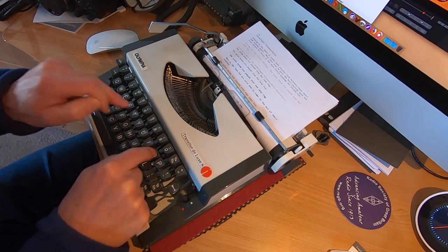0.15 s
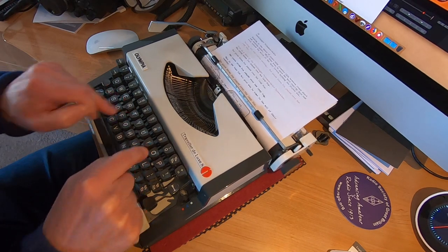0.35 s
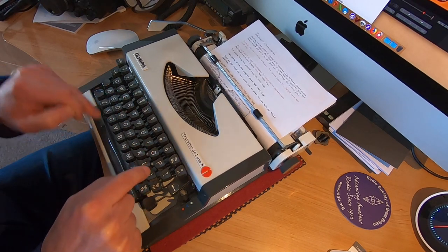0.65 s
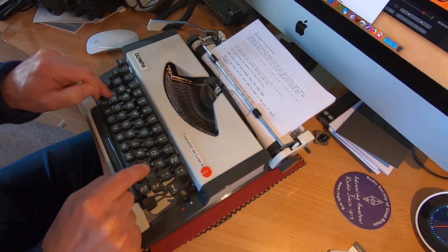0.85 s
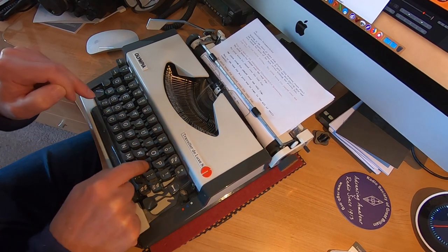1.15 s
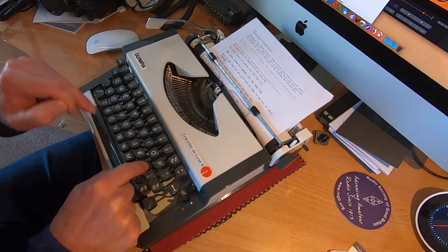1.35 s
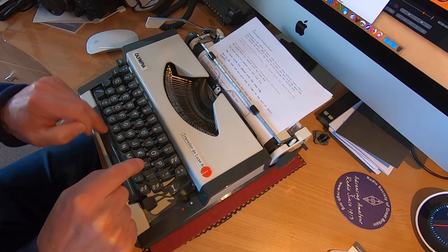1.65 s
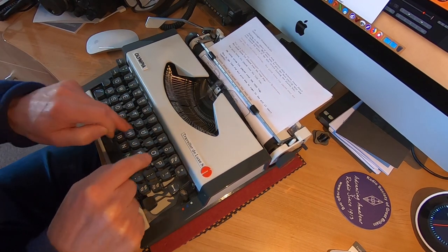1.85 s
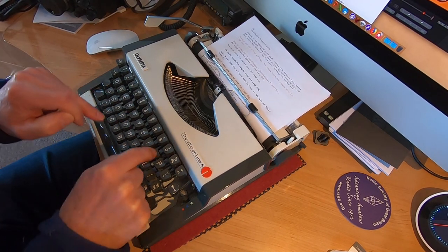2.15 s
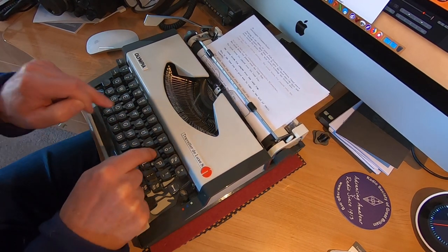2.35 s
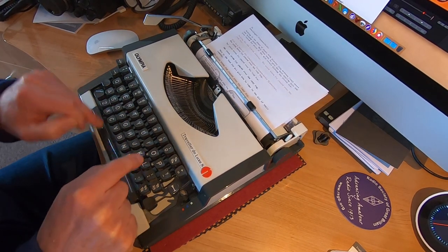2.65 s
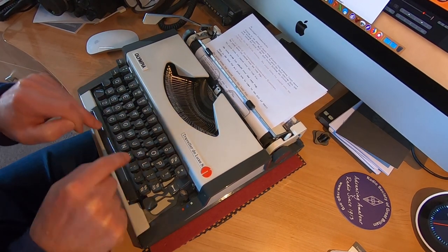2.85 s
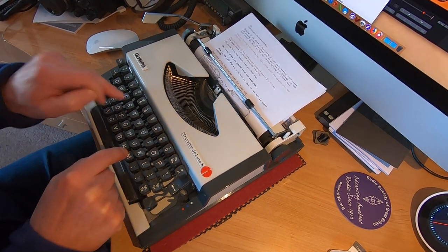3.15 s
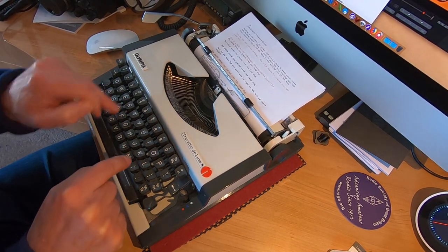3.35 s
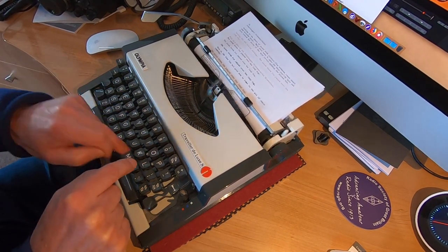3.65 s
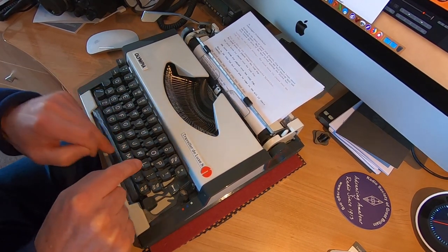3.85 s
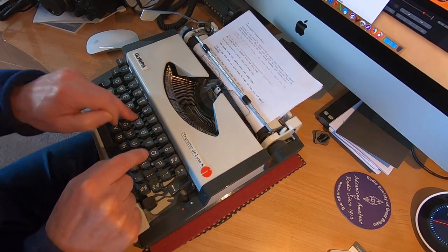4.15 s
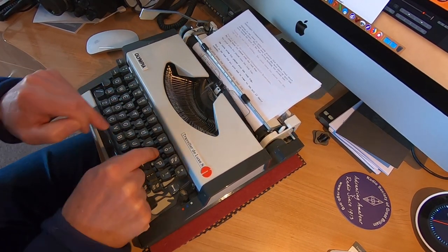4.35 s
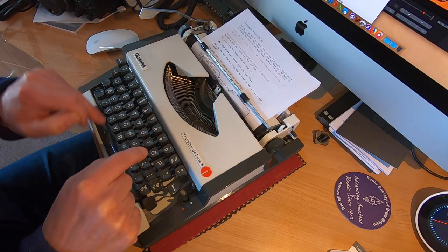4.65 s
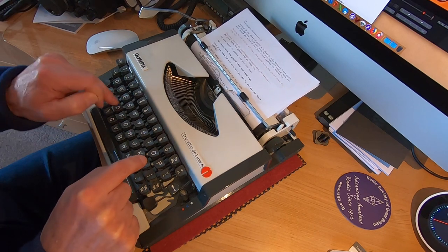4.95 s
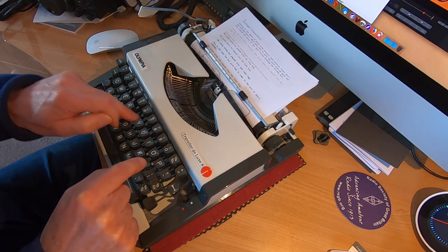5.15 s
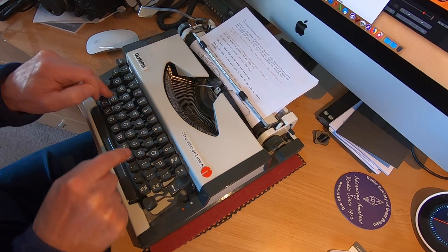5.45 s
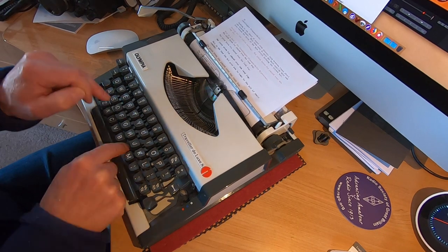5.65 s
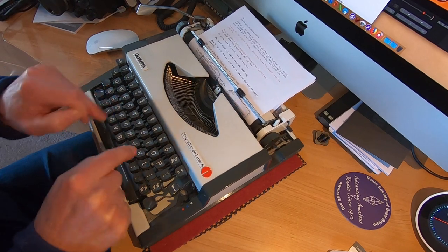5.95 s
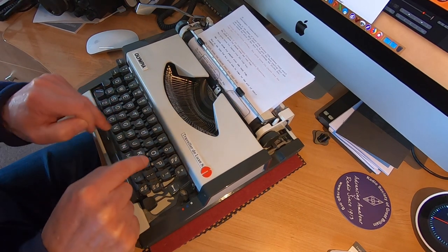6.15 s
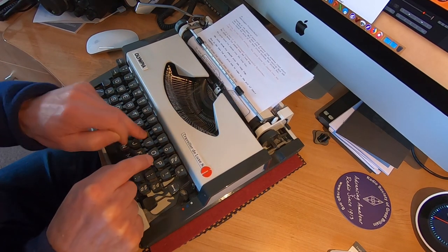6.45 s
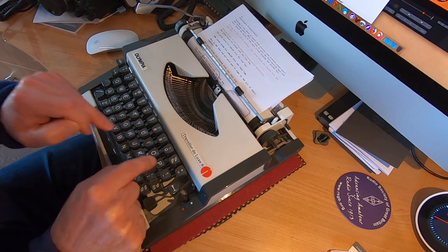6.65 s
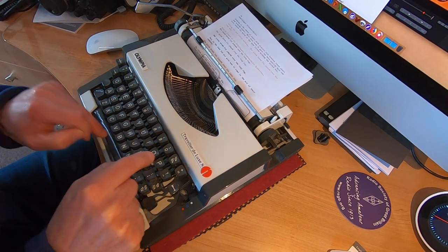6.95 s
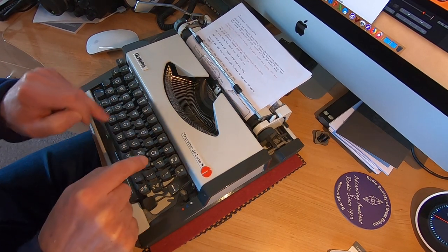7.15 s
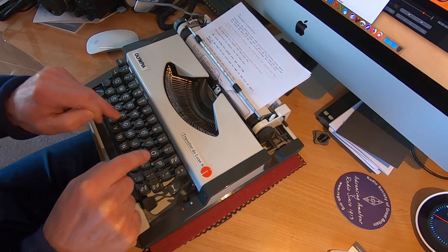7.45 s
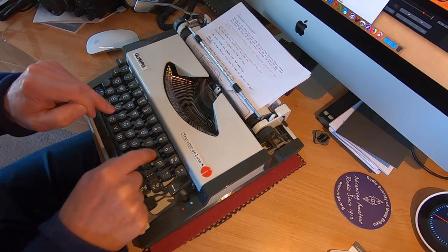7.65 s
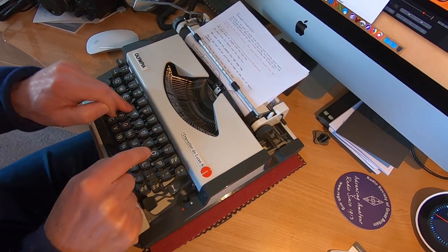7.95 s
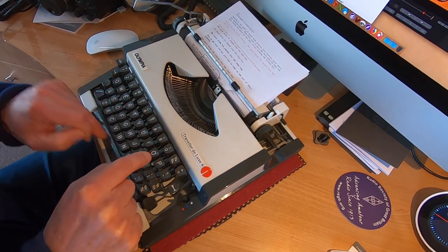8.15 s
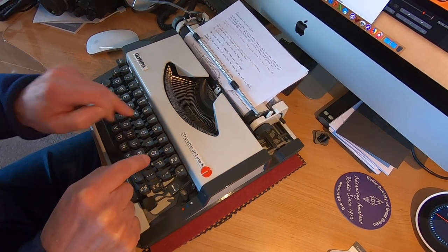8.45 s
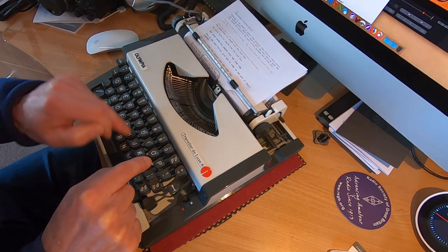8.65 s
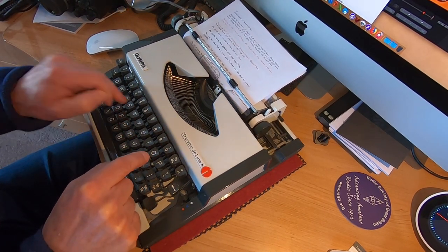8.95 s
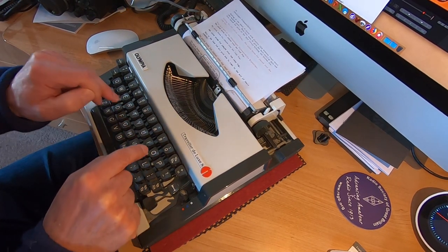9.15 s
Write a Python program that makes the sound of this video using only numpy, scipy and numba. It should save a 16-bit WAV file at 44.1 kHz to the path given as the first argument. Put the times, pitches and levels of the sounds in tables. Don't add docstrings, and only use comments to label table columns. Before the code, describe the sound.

Two fingers type steadily on a portable manual typewriter, sharp steel cracks on the platen, rattling levers, and duller space-bar knocks booming in a wooden desk.

```python
import sys
import numpy as np
from scipy import signal
from scipy.fft import rfft, irfft, next_fast_len
from scipy.io import wavfile
from numba import njit

SR = 44100
rng = np.random.default_rng(int(sys.argv[2]) if len(sys.argv) > 2 else 0)


def materialize(psi):
    bounded = np.clip(np.atleast_2d(psi).T, -1, 1)
    quanta = np.round(bounded * 32767).astype(np.int16)
    wavfile.write(sys.argv[1], SR, quanta)


def volts_from_decibels(level):
    exponent = np.asarray(level, float) / 20
    return 10 ** exponent


N = 409688


def level(x, db):
    return x * volts_from_decibels(db) / np.sqrt(np.mean(x ** 2))


def on_log_axis(table, hz):
    f, v = np.transpose(table)
    return np.interp(np.log(hz + 1), np.log(f + 1), v)


def colour(x, table):
    log_gain = on_log_axis(table, np.linspace(0, SR / 2, 2049)) * np.log(10) / 20
    cepstrum = irfft(log_gain)
    cepstrum[1:2048] *= 2
    cepstrum[2049:] = 0
    h = irfft(np.exp(rfft(cepstrum)))[:2048]
    return signal.oaconvolve(x, h / np.sqrt(np.sum(h ** 2)))[:N]


def soft(x, ms):
    w = np.hanning(int(ms * SR / 1000) + 3)
    return signal.oaconvolve(x, w / w.sum())[:N]


def ring(modes, scatter_db=0., detune=0.):
    hz, db, t60 = np.transpose(modes)[:, :, None]
    chance = rng.standard_normal((len(modes), 2))
    t = np.arange(int(SR * t60.max())) / SR
    decay = volts_from_decibels(db + scatter_db * chance[:, :1] - 60 * t / t60)
    h = np.sum(decay * np.sin(2 * np.pi * hz * (1 + detune * chance[:, 1:]) * t), axis=0)
    return h / np.abs(h).max()


def add(track, s, x):
    k = int(s * SR)
    piece = x[max(-k, 0):max(N - k, 0)]
    track[max(k, 0):max(k, 0) + len(piece)] += piece


def envelope(rise_ms, hold_ms, change_db, t60_ms):
    return [(-rise_ms, -40), (0, 0), (hold_ms, change_db), (hold_ms + t60_ms * 2 / 3, change_db - 40)]


def fade_db(shape):
    ms, db = np.transpose(shape)
    return np.interp(np.arange(ms[0], ms[-1], 1000 / SR), ms, db)


def burst(power, s, shape, db):
    add(power, s + shape[0][0] / 1000, volts_from_decibels(db + fade_db(shape)) ** 2)


@njit
def grains(starts, hz, size, t60):
    out = np.zeros(N)
    for k in range(len(starts)):
        r, w = np.exp(-np.log(1000) / (t60[k] * SR)), 2 * np.pi * hz[k] / SR
        turn, now, before = 2 * r * np.cos(w), size[k] * np.sin(w), 0.
        for i in range(starts[k], min(starts[k] + int(t60[k] * SR * .5), N)):
            out[i] += now
            now, before = turn * now - r * r * before, now
    return out


def clatter(power, table, rate, spread_db, ring_ms, dense):
    when, pitch, luck = rng.random((int(rate * N / SR), 3)).T
    starts = (when * N).astype(np.int64)
    hz = 200 + 16000 * pitch ** 1.5
    t60 = ring_ms / 1000 * (hz / 3000) ** -.4
    size = volts_from_decibels(-spread_db * np.log(1 - .995 * luck)) * pitch ** .25 / np.sqrt(t60)
    size /= np.sqrt(np.sum(size ** 2 * t60) * SR / (4 * np.log(1000)) / N)
    live = power[starts] > 0
    contacts = grains(starts[live], hz[live], (size * np.sqrt(power[starts]))[live], t60[live])
    rustle = np.sqrt(power) * rng.standard_normal(N)
    return colour(np.sqrt(1 - dense) * contacts + np.sqrt(dense) * rustle, table)


def jolts(rows, lag_ms, gain_db):
    out = np.zeros(N)
    for s, db in rows:
        add(out, s + lag_ms / 1000, volts_from_decibels(np.array([db + gain_db])))
    return out


# frequency in Hz, gain in dB.
HUSH_COLOUR = [(15, -51), (25, -5), (112, 9.5), (383, -30), (558, -23), (621, -15.5), (856, -41),
               (1240, -19.5), (1950, -30), (2180, -18.5), (2400, -33), (3630, -30.5), (15000, -55)]


def hush():
    shared, apart = [level(colour(rng.standard_normal(N), HUSH_COLOUR), -53) for _ in range(2)]
    return shared + 0.64 * apart * np.array([[1], [-1]])


# start in seconds, weight on the desk in dB.
TOUCHES = [(.010, -37.5), (0.1982, -37.5), (0.3124, -41), (0.8914, -39), (1.1928, -40), (1.396, -39.5),
           (1.9147, -38.5), (2.1692, -38.5), (2.3707, -42), (2.5268, -39.5), (3.0602, -37), (3.2947, -41.5),
           (3.699, -40), (4.2173, -39.5), (4.4026, -42), (4.9006, -36), (5.2033, -35.5), (5.509, -40),
           (5.7273, -38.5), (5.887, -41.5), (6.476, -38.5), (6.827, -39.5), (7.416, -37), (7.737, -36),
           (7.985, -36), (8.576, -38.5), (8.7798, -37), (9.0716, -34.5)]
# start in seconds, knock level in dB.
RESTS = [(0.138, -40.5), (0.335, -42), (0.444, -38.5), (1.025, -30), (1.311, -46), (1.529, -38),
         (2.03, -44), (2.29, -40.5), (2.5, -36.5), (2.669, -40), (3.175, -47.5), (3.42, -42.5),
         (3.809, -34.5), (4.334, -36.5), (4.543, -40.5), (5.048, -32), (5.335, -33.5), (5.637, -31),
         (5.888, -38), (6.002, -32.5), (6.586, -40), (6.946, -39), (7.528, -43.5), (7.873, -52),
         (8.11, -36.5), (8.709, -28), (8.893, -32), (9.186, -51)]
# frequency in Hz, gain in dB.
LEVER_COLOUR = [(240, -24.5), (400, -12), (774, 0), (1080, -5), (1640, -2), (1770, -3.5), (2370, 0),
                (2720, -4.5), (2980, 1.5), (6830, -4), (9290, -5), (11700, -28), (14500, -25), (15600, -52)]


def levers():
    swing_grows_db = 10.5
    fall_from_ms = 18.3
    power = np.zeros(N)
    for (touch_s, _), (s, *_), (rest_s, _) in zip(TOUCHES, BLOWS, RESTS):
        swing_ms = 1000 * (s - touch_s)
        fall_ms = 1000 * (rest_s - s) - fall_from_ms
        swing_db = -31.5 - 0.27 * (swing_ms - 29.3)
        burst(power, touch_s, envelope(11, swing_ms, swing_grows_db, 15), swing_db - swing_grows_db)
        burst(power, s + 0.00374, envelope(19, -8.5, -3, 65), -29.5)
        burst(power, s + STEP_MS / 1000, envelope(25, -0.5, 1, 128), -35.5)
        burst(power, s + fall_from_ms / 1000, envelope(72, fall_ms, -0.5, 281), -42.5)
    return clatter(power, LEVER_COLOUR, 6000, 2.4, 16.0, dense=.45)


# frequency in Hz, level in dB, t60 in seconds.
DESK_MODES = [(41, -24.5, 0.2), (77.44, 2, 0.61), (93.8, 8.5, 0.26), (114.2, 0, 0.32), (159, -14.5, 0.13),
              (271, -17, 0.18)]


def desk():
    keys = [(s, db) for (s, *_), (_, db) in zip(BLOWS, TOUCHES)]
    landings = [(s, 0.38 * (db + 40.5)) for s, db in RESTS]
    push = jolts(keys, 6, 5.3) + jolts(keys, 50, 2.2)
    push -= jolts(TOUCHES, 4.1, -1)
    push += jolts(landings, 1.03, -41.5)
    for rows, lag_ms in zip(spaces(), (11, 5, 12)):
        push += jolts([(s, db) for s, _, db in rows], lag_ms, 0.69)
    lingering = signal.lfilter([1], [1, -volts_from_decibels(-60 / (.3 * SR))], np.abs(push) + 1e-18)
    shake = lingering * rng.standard_normal(N)
    sprung = signal.lfilter(*signal.butter(2, 55, "high", fs=SR), push + 1e-18)
    feet_contact_ms = 1.8
    return signal.oaconvolve(soft(sprung + volts_from_decibels(-25.5) * shake, feet_contact_ms), ring(DESK_MODES))[:N]


# frequency in Hz, gain in dB.
PLATEN_COLOUR = [(320, -41.5), (550, -24), (1240, -6.5), (1470, -16.5), (2110, -2.5), (3260, -4),
                 (3650, -5), (5630, -4), (6210, -8.5), (6750, -3.5), (9320, -9), (10700, -23),
                 (15600, -34.5)]


def ribbon_and_paper():
    power = np.zeros(N)
    for s, *_ in BLOWS:
        burst(power, s - .005, envelope(11, 5, .5, 12), -26)
        burst(power, s + .001, envelope(1.5, 2, -1, 58), -22)
    return clatter(power, PLATEN_COLOUR, 14000, 1.8, 6.0, dense=.55)


# start in seconds, peak in dB, platen pitch in Hz, steel ring in dB against the peak.
BLOWS = [(0.0446, -8.5, 2730, -3.5), (0.2363, -7.0, 2560, -9.5), (0.3381, -7.0, 2560, -7.0),
         (0.9258, -7.5, 2320, -5.5), (1.2315, -10.5, 2560, -8.5), (1.4285, -9.0, 2590, -6.5),
         (1.9482, -8.0, 2520, -3.5), (2.2112, -9.5, 2540, -4.5), (2.4108, -8.5, 2520, -4.5),
         (2.5685, -9.0, 2540, -0.5), (3.0885, -10.0, 2510, -0.5), (3.3272, -9.0, 2510, -1.5),
         (3.728, -10.0, 2480, -2.0), (4.2482, -10.0, 2460, -4.0), (4.4388, -10.0, 2510, -4.5),
         (4.9396, -10.5, 2890, -5.0), (5.2397, -11.0, 2460, -1.0), (5.5451, -10.5, 2400, -1.0),
         (5.7602, -13.0, 2530, 2.5), (5.9079, -14.0, 2200, 2.5), (6.5043, -13.5, 2470, 3.5),
         (6.8673, -14.5, 2990, -0.5), (7.4463, -12.5, 2830, 1.5), (7.7763, -12.5, 2980, 3.0),
         (8.0097, -12.5, 2690, 3.0), (8.6112, -10.0, 2900, -3.0), (8.8137, -12.0, 3110, 1.0),
         (9.1014, -14.0, 2980, 3.5)]
# frequency in Hz, level in dB, t60 in seconds.
SLUG_MODES = [(4270, -1.5, .016), (5650, 2.5, .015), (6600, 3.5, .016), (8000, -1.5, .017),
              (9300, -1.5, .018)]
# share of the platen pitch as a ratio, level in dB, t60 in seconds.
PLATEN_MODES = [(.8, -7, .016), (1.0, 0, .013), (1.3, -4.5, .013)]


def slugs():
    out = np.zeros(N)
    for s, db, hz, steel_db in BLOWS:
        steel = volts_from_decibels(db + steel_db + 1) * ring(SLUG_MODES, scatter_db=3, detune=.04)
        platen = volts_from_decibels(db + 2.5) * ring(np.array(PLATEN_MODES) * [hz, 1, 1], scatter_db=2)
        add(out, s - .0004, steel)
        add(out, s - .0002, platen)
        add(out, s + .003, volts_from_decibels(-6) * steel)
    no_bass = signal.butter(3, 1500, "high", fs=SR, output="sos")
    return signal.sosfilt(no_bass, soft(out, .06))


STEP_MS = 30.6
# frequency in Hz, level in dB, t60 in seconds.
FRAME_MODES = [(272, -6.5, 0.091), (457, -11.5, 0.12), (675, -17, 0.067), (762, -1, 0.057),
               (930, -4.5, 0.078), (1198, -8.5, 0.076)]


def frame():
    knocks = [(s, -42) for s, *_ in BLOWS]
    knocks += [(s + (STEP_MS + 6) / 1000, -34.5) for s, *_ in BLOWS]
    knocks += [(s + 0.00256, db + 2.5) for s, db in RESTS]
    out = np.zeros(N)
    for s, db in knocks:
        add(out, s, volts_from_decibels(db) * ring(FRAME_MODES, scatter_db=3, detune=.03))
    return soft(out, 0.28)


# start in seconds, peak in dB, pitch in Hz.
TICKS = [(0.1958, -21.5, 3750), (2.371, -25.5, 3340), (3.458, -23, 8900), (3.4756, -30, 9070),
         (4.3954, -30, 3060), (4.5481, -39, 3730), (5.0813, -23, 8400), (5.2003, -37, 4500),
         (5.675, -27, 8000), (6.041, -22, 8900), (7.5717, -21.5, 8900), (7.5997, -47, 9310),
         (7.7363, -31, 3470), (7.98, -21, 3170), (8.1502, -29.5, 8900), (8.7473, -21.5, 8350)]


def ticks():
    stem, spring = envelope(1.5, 3.5, 2, 68.5), envelope(15, 16, -12, 169)
    fizzes = [(s, db - 7.0, hz, 3.0, stem) for s, db, hz in TICKS]
    fizzes += [(s + .02, db - 5, 12900, 60, spring) for s, db, _ in spaces()[2]]
    out = np.zeros(N)
    for s, db, hz, sharpness, shape in fizzes:
        fade = volts_from_decibels(db + fade_db(shape))
        fizz = signal.lfilter(*signal.iirpeak(hz, sharpness, SR), rng.standard_normal(len(fade)))
        add(out, s + shape[0][0] / 1000, fade * fizz)
    return soft(out, .07)


# bar down in seconds, time until the carriage stops in ms,
# time until the bar is up in ms, peak in dB, weight on the desk in dB.
SPACES = [
    (.61, 30, 83, -21, -34),
    (1.6526, 29.5, 82, -21, -35),
    (2.7938, 35, 93, -21.5, -31.5),
    (3.9524, 33, 74, -19, -30),
    (4.5938, 34, 94, -19.5, -31.5),
    (6.1441, 33, 81, -20.5, -33.5),
    (7.0643, 34, 97, -18.5, -34),
    (8.2734, 36, 96, -19.5, -34),
]


def spaces():
    s, stop_ms, up_ms, db, jolt_db = np.transpose(SPACES)
    down = np.c_[s, db, jolt_db]
    stop = np.c_[s + stop_ms / 1000, db + 3, jolt_db - 7.5]
    up = np.c_[s + up_ms / 1000, db - 5.5, jolt_db - 2.5]
    return down, stop, up


# frequency in Hz, gain in dB.
BAR_COLOUR = [(240, -58), (400, -4.5), (644, -16), (750, 3.5), (989, -7.5), (1170, -6), (1800, -6),
              (3030, -5), (3320, -4.5), (7970, -7), (15600, -36.5)]
# frequency in Hz, level in dB, t60 in seconds.
BAR_MODES = [(287, -.5, .11), (665, -9.5, 0.036), (750, -1, .04), (810, -3, .04), (1230, -6, 0.04)]
# frequency in Hz, level in dB, t60 in seconds.
LINK_MODES = [
    [(3050, 0, .05)],
    [(6400, -3, .03), (8100, 0, .035)],
    [(3100, 0, .2), (4050, -1, .2)],
]


def space_bar():
    down, stop, up = (14, 12.6, 0.95, 194), (1.5, 7.5, -4, 59.5), (5, 23.3, 2.1, 142)
    rattle_lags_ms, hum_lags_s = (-.5, 1, -1), (.014, .003, .016)
    hum_dbs, ping_dbs = (-8, -18, -7.5), (-8, -10, -16)
    power, body, links = np.zeros((3, N))
    parts = zip(spaces(), (down, stop, up), rattle_lags_ms, hum_lags_s, hum_dbs, LINK_MODES, ping_dbs)
    for rows, shape, lag_ms, hum_lag_s, hum_db, ping, ping_db in parts:
        for s, db, _ in rows:
            burst(power, s + lag_ms / 1000, envelope(*shape), db - 16.5)
            add(body, s + hum_lag_s, volts_from_decibels(db + hum_db) * ring(BAR_MODES, scatter_db=1.5, detune=0.022))
            add(links, s + hum_lag_s / 4, volts_from_decibels(db + ping_db) * ring(ping, scatter_db=1.5, detune=.02))
    rattle = clatter(power, BAR_COLOUR, 6000, 2.4, 13.0, dense=.45)
    return rattle + soft(body, 0.92) + soft(links, .07)


# band centre in Hz, t60 in seconds.
ROOM_DECAY = [(300, 0.43), (1200, 0.37), (4000, 0.22), (10000, 0.23)]


def room(x):
    t = np.arange(int(.6 * SR)) / SR
    tails = []
    for _ in range(2):
        tail = np.zeros(len(t))
        for hz, t60 in ROOM_DECAY:
            band = signal.butter(1, [hz / 2, min(2 * hz, 20000)], "band", fs=SR)
            tail += signal.lfilter(*band, rng.standard_normal(len(t))) * volts_from_decibels(-60 * t / t60)
        tail *= np.clip(t / 0.072, 0, 1)
        tails.append(signal.oaconvolve(x, tail / np.sqrt(np.sum(tail ** 2)))[:N])
    return np.array(tails)


# frequency in Hz, correlation from 0 to 1.
LIKENESS = [(30, 0.96), (80, 0.9), (160, 0.77), (300, 1), (700, 0.53), (2500, 0.87), (5000, 0.61),
            (9000, 0.045), (15000, .1)]
# frequency in Hz, left minus right in dB.
BALANCE = [(60, 4.5), (150, -3.5), (300, 2), (600, -2), (2500, -0.5), (9000, -2), (14000, 4)]


def two_ports(mid, other):
    size = next_fast_len(N)
    hz = np.arange(size // 2 + 1) * SR / size
    like = np.clip(on_log_axis(LIKENESS, hz), 0, .99)
    centre = rfft(mid, size)
    side = 1j * np.sqrt((1 - like) / (1 + like)) * rfft(other, size)
    tilt = volts_from_decibels(on_log_axis(BALANCE, hz) / 2)
    return irfft(np.array([(centre + side) * tilt, (centre - side) / tilt]), size)[:, :N]


def typewriter():
    return levers() + ribbon_and_paper() + slugs() + frame() + ticks() + space_bar()


def scene():
    machine, flank = typewriter(), typewriter()
    return two_ports(machine + desk(), flank + desk()) + volts_from_decibels(-16.5) * room(machine) + hush()


def band_limit(x):
    return signal.sosfilt(signal.butter(12, 15800, fs=SR, output="sos"), x)


def record(dry):
    dipped = dry - 0.77 * signal.lfilter(*signal.iirpeak(395, 9, SR), dry)
    limited = np.tanh(0.86 * dipped) / 0.75
    mix = signal.sosfilt(signal.ellip(8, .2, 70, 15800, fs=SR, output="sos"), limited)
    return band_limit(mix)


dry = scene()
out = record(dry)
materialize(out)
```